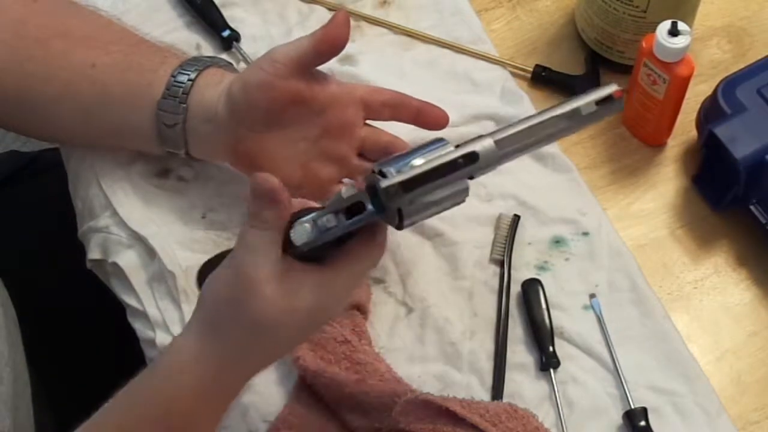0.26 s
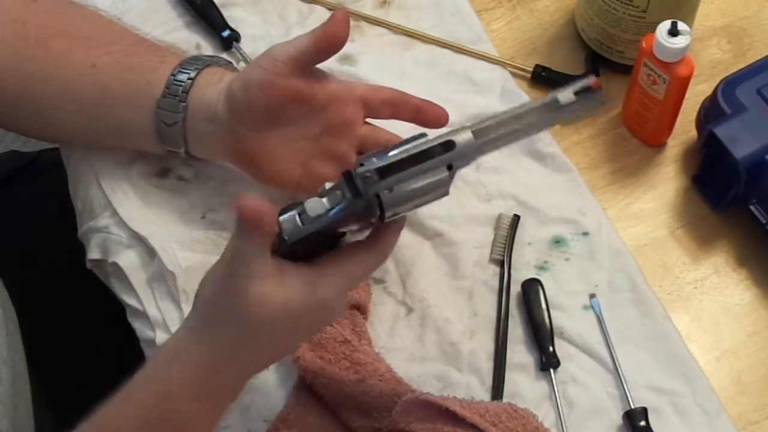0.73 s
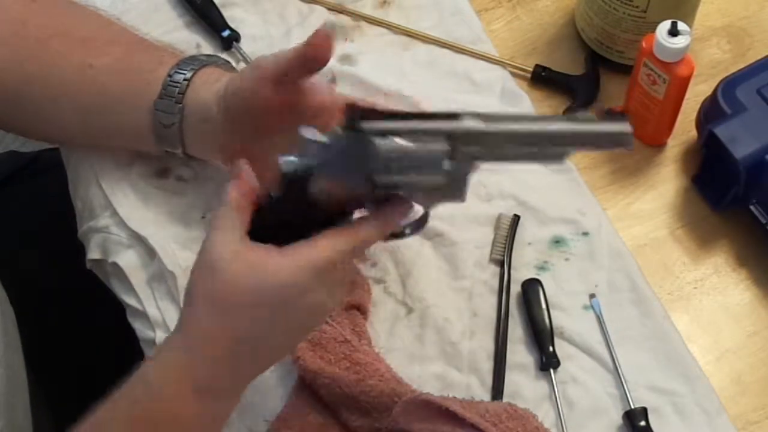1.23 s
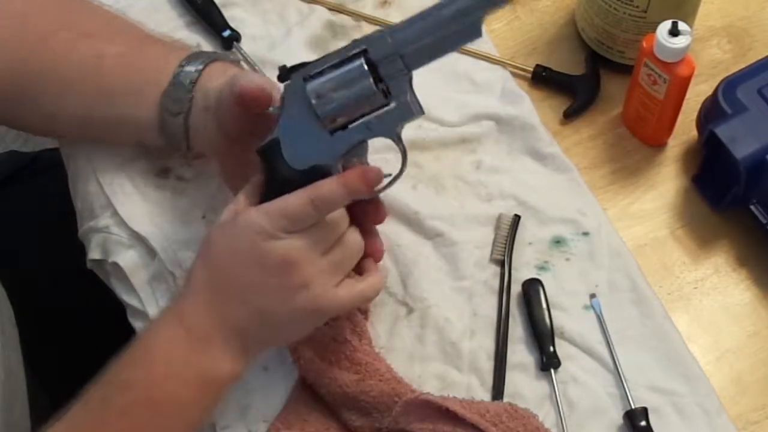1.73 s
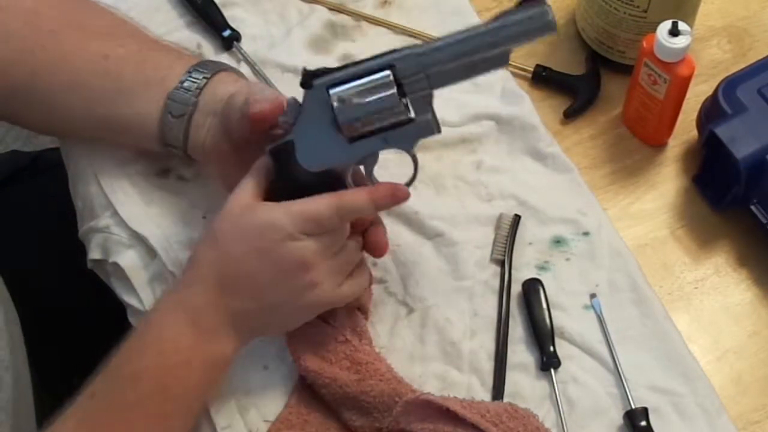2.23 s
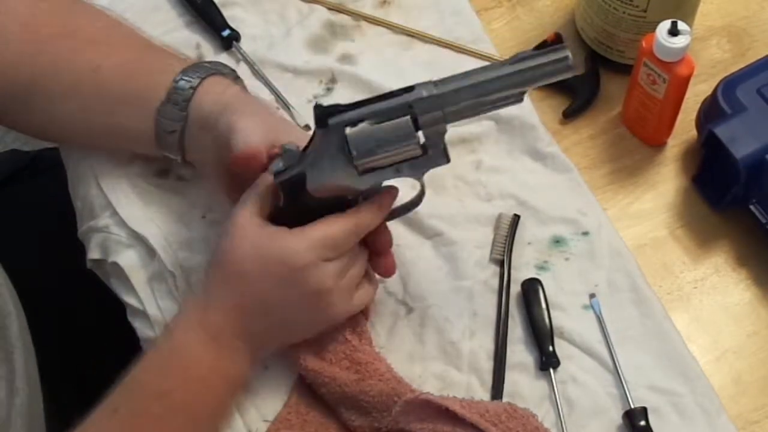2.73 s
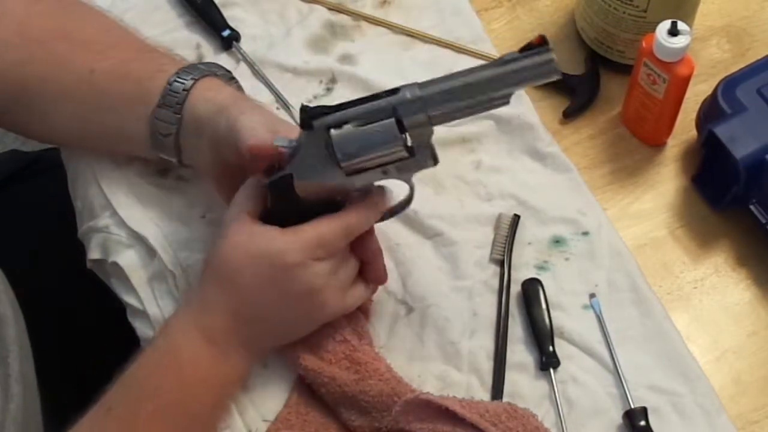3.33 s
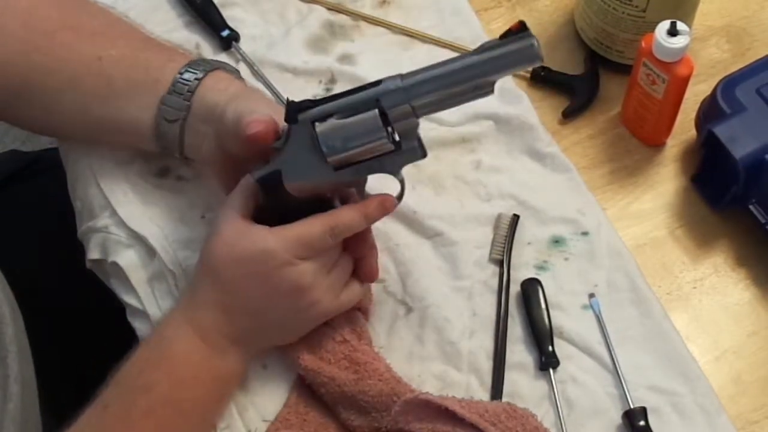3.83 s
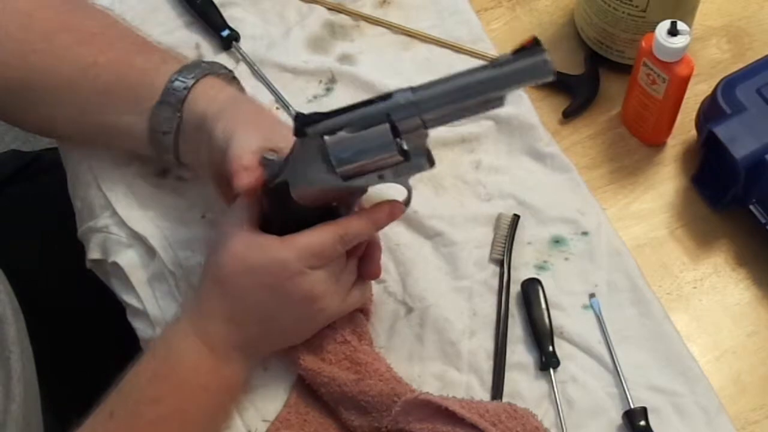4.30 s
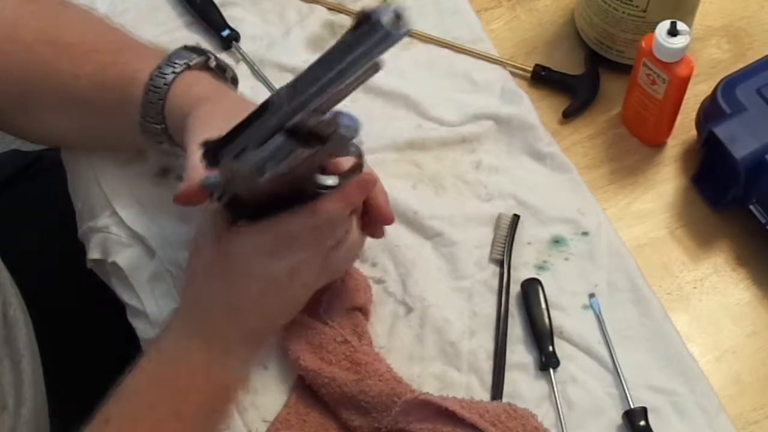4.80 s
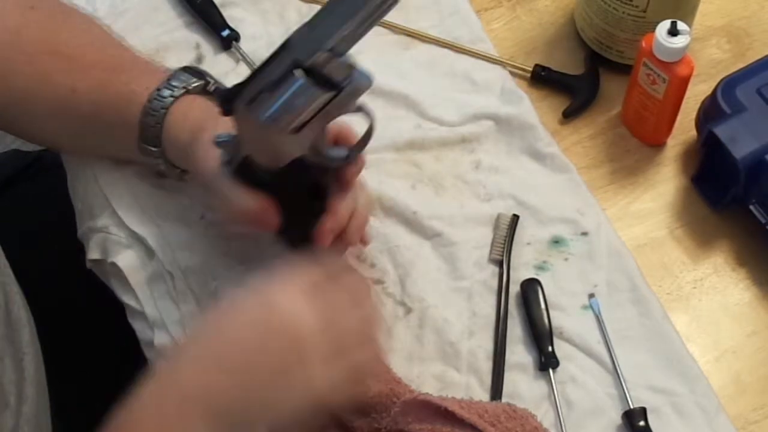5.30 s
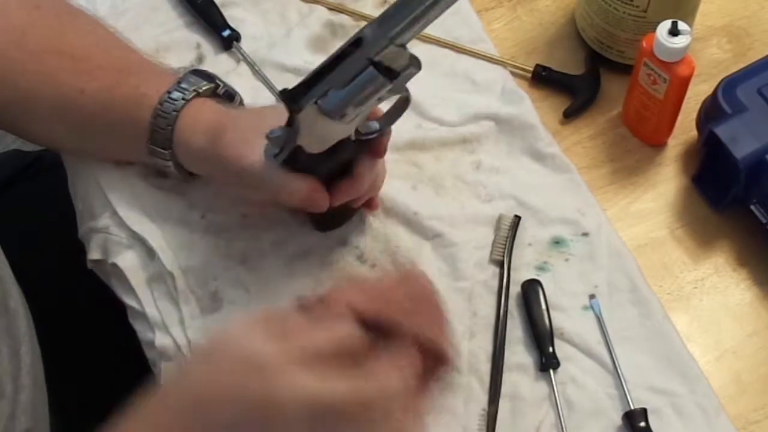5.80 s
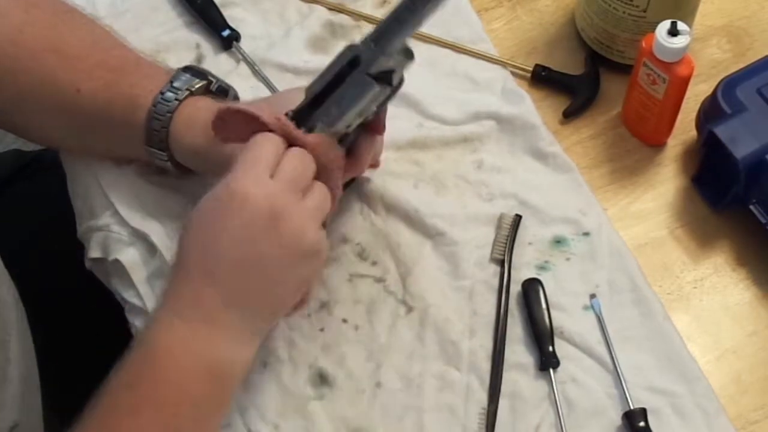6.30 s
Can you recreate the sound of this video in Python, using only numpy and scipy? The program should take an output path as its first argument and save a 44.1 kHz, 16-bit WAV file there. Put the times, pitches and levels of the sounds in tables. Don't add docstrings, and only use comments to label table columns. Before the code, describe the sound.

Two loud, sharp metallic hammer snaps, each followed by trigger clicks and later cocking clicks, then soft cloth brushes in a quiet room with a faint fan.

```python
import sys
import numpy as np
from scipy import signal
from scipy.fft import rfft, irfft, next_fast_len
from scipy.io import wavfile
from scipy.ndimage import uniform_filter1d, map_coordinates

SR = 44100
rng = np.random.default_rng(int(sys.argv[2]) if len(sys.argv) > 2 else 0)


def ratio(d):
    e = np.asarray(d, float) / 20
    return 10 ** e


def output_pcm(signal):
    pcm = np.clip(np.atleast_2d(signal).T, -1, 1) * 32767
    wavfile.write(sys.argv[1], SR, np.round(pcm).astype(np.int16))


N = 288842


def unit(x):
    return x / np.sqrt(np.mean(x ** 2) + 1e-20)


def along(points, hz):
    point_hz, values = np.transpose(points)
    return np.interp(np.log(hz + 1), np.log(point_hz + 1), values)


def filtered(x, response):
    size = next_fast_len(x.shape[-1] + 8192)
    spectrum = rfft(x, size) * response(np.fft.rfftfreq(size, 1 / SR))
    return irfft(spectrum, size)[..., :x.shape[-1]]


def add(track, start_s, sound):
    part = track[round(start_s * SR):][:len(sound)]
    part += sound[:len(part)]


def wobble(rate_hz):
    knots = rng.standard_normal(int(N * rate_hz / SR) + 4)
    return map_coordinates(knots, [np.arange(N) * rate_hz / SR], order=1)


def narrow(hz, wander_hz):
    phase = 2 * np.pi * np.cumsum(hz + wander_hz * wobble(7.3)) / SR
    return np.sqrt(2) * ratio(1.5 * wobble(11)) * np.sin(phase)


def puffs(table, width):
    out = np.zeros(N)
    t = np.arange(SR // 4) / SR - 1 / 8
    for s, length_s, hz, db in table:
        band = lambda f: np.exp(-((f - hz) / (width * hz)) ** 2)
        rasp = filtered(rng.standard_normal(len(t)), band)
        swell = ratio(db) * unit(rasp) * np.exp(-(t / length_s * 2) ** 2)
        start_s = s + t[0]
        add(out, max(start_s, 0), swell[max(-round(start_s * SR), 0):])
    return out


# (frequency [Hz], density [dB per Hz])
AIR_SPECTRUM = [(15, -39), (38, -21), (100, -19), (250, -13.5), (700, -12), (1850, -17.5), (4300, -25),
                (15000, -27.5)]
# (frequency [Hz], wander [Hz], level [dB])
FAN_TONES = [(59.24, .5, -79.5), (444.3, 2.4, -66), (489, 2.6, -76.5), (606, 2.97, -74), (820, 3.4, -78),
             (1820, 10, -79)]
# (time [s], frequency [Hz], level [dB])
BEARING_CHIRPS = [(2.12, 2660, -75), (3.75, 2700, -77), (4.075, 2700, -74), (4.52, 2600, -70),
                  (4.902, 2600, -69), (5.121, 3120, -68.5), (5.296, 2710, -66), (5.56, 2720, -72),
                  (5.782, 2650, -65), (6.113, 2664, -66)]


def fan():
    air = filtered(rng.standard_normal(N), lambda f: ratio(along(AIR_SPECTRUM, f)))
    rush = ratio(-58 + 0.49 * wobble(1.1)) * unit(air)
    hum = sum(ratio(db) * narrow(hz, wander_hz) for hz, wander_hz, db in FAN_TONES)
    chirp_s = 0.1
    return rush + hum + puffs([(s, chirp_s, hz, db) for s, hz, db in BEARING_CHIRPS], width=0.048)


# (time [s], length [s], centre [Hz], level [dB])
STROKES = [(.05, 0.04, 1370, -54.5), (2.4, 0.23, 700, -64), (4.38, 0.024, 700, -54),
           (4.47, 0.04, 1280, -56.5), (5.8, 0.024, 1020, -57), (5.84, .08, 1110, -62),
           (6.29, 0.036, 600, -59), (6.37, 0.023, 740, -52), (6.41, 0.061, 885, -53.5),
           (6.45, 0.027, 1700, -60), (6.51, 0.027, 754, -56)]


def rustle():
    return puffs(STROKES, width=0.51)


# (delay [s], level [dB])
WALL_ECHOES = [(.0058, -7.5), (0.0095, -21.5), (.0165, -24), (.022, -28.5), (.031, -28)]
# (frequency [Hz], t60 [s])
ROOM_T60 = [(200, .12), (800, 0.35), (2000, 0.3), (5500, 0.34), (9000, 0.34), (14600, .27)]
# (frequency [Hz], level [dB])
ROOM_RETURN = [(400, -4.5), (1300, 1.5), (2300, 0.5), (4800, -1), (8000, -2.5), (14000, -2)]


def in_room(x, walls_db, wet_db, onset_s, blur):
    echoes = np.zeros(2048)
    smear = ratio(-60 * np.arange(128) / SR / 0.0031)
    for delay_s, db in WALL_ECHOES:
        echo = smear * rng.standard_normal(128)
        add(echoes, delay_s, ratio(db + walls_db) * echo / np.linalg.norm(echo))
    echoes[0] += 1

    hz, t = np.fft.rfftfreq(256, 1 / SR), np.arange(140) * 128 / SR
    cells = rng.standard_normal((140, 129)) + 1j * rng.standard_normal((140, 129))
    decay = ratio(-60 * t[:, None] / along(ROOM_T60, hz))
    grains = irfft(cells * decay) * np.hanning(256)
    tail = (grains[1:, :128] + grains[:-1, 128:]).ravel()
    tail *= 1 - np.exp(-(np.arange(len(tail)) / SR / onset_s) ** 2)

    power = uniform_filter1d(np.abs(rfft(x, len(tail))) ** 2, blur)
    power *= ratio(2 * along(ROOM_RETURN, np.fft.rfftfreq(len(tail), 1 / SR)))
    wet = ratio(wet_db) * tail / np.linalg.norm(tail)
    out = irfft(rfft(wet) * np.sqrt(np.abs(power)))
    out[:64] = 0
    add(out, 0, signal.fftconvolve(x, echoes))
    return out


# (time [s], peak [dB], frequency [Hz], t60 [s])
LONE_KNOCKS = [(.0185, -34, 1360, .012), (.0189, -38, 1880, 0.025), (.019, -52, 2500, 0.0074),
               (.02, -47, 440, 0.023), (3.3835, -31, 1040, 0.032), (3.387, -28.5, 1960, .3),
               (3.384, -23.5, 4370, 0.3), (4.276, -23.5, 1975, 0.21), (5.797, -47, 1230, .025),
               (5.799, -52, 678, 0.027), (6.277, -51, 600, .02), (6.365, -35, 3550, 0.15)]
PART_KNOCKS = {"hammer": [(.4, 2.5, 1472, .0055), (.1, 1.5, 361, .006), (.1, 6.5, 733, 0.0032),
               (5.4, -4.5, 745, .005), (1.9, -14.5, 1746, .3), (1.9, -24, 1581, .25),
               (1.9, -21.5, 2403, 0.45), (1.9, -22, 2757, .3), (1.9, -21.5, 3114, .4),
               (1.9, -21, 3700, .42), (1.9, -18, 4420, .4), (1.9, -17, 5460, 0.47), (1.9, -21, 5100, 0.54),
               (1.9, -22, 6810, .4), (1.9, -8.5, 7900, .4), (1.9, -13.5, 9250, .4), (1.9, -15, 12400, .4)],
               "stop": [(.1, -20, 89, 0.084)], "trigger": [(.6, -26, 1310, 0.0054), (1.1, -11, 3480, 0.34),
               (2.1, -7.5, 2456, 0.28)], "bolt": [(4, -27, 94, 0.085)], "hand": [(.2, -20.5, 1025, 0.06)],
               "sear": [(1.2, -15, 740, 0.016), (2.7, -21.5, 260, 0.032), (18, -26, 94, 0.13),
               (2.7, -1, 4490, 0.35), (2.18, -2, 3000, 0.14)]}


def knocks():
    out, t = np.zeros(N), np.arange(SR // 3) / SR
    struck = [(s + ms / 1000, db + under_db, hz, t60_s)
              for part in PART_KNOCKS
              for s, db, _ in PART_CONTACTS[part]
              for ms, under_db, hz, t60_s in PART_KNOCKS[part]]
    for s, db, hz, t60_s in struck + LONE_KNOCKS:
        tones_hz = hz * rng.normal(1, 0.012, size=(8, 1))
        cluster = np.sin(2 * np.pi * tones_hz * t).mean(axis=0)
        push = ratio(db + 1.0 - 60 * t / t60_s) * cluster * (1 - np.exp(-t * hz * 9))
        add(out, s, in_room(push, walls_db=-7.5, wet_db=-19, onset_s=0.0087, blur=21))
    return signal.sosfilt(signal.butter(2, 125, "high", fs=SR, output="sos"), out)


# (frequency [Hz], level [dB], t60 [s])
FRAME_MODES = [(1964, -3.5, .012), (2650, 7.5, .0072), (3860, 5, .0075), (4300, -4, 0.018),
               (6820, -3, 0.0062), (7700, -4.5, 0.0066), (9410, -4, 0.0074), (9980, -5.5, 0.009),
               (12250, 2.5, 0.0036), (13570, 0, .006), (14200, -3, .006), (14700, -8, .006)]
GROUP_CENTRES_HZ = [2200, 4200, 7000, 9500, 12500]
# (frequency [Hz], level [dB])
CRACK_SPECTRUM = [(600, -27.5), (1400, -15), (2200, 6), (4300, 5), (5500, -3), (7000, -1), (15000, -3)]


def strike(crack_db, crack_s):
    t = np.arange(1024) / SR
    member = np.eye(len(GROUP_CENTRES_HZ))
    hz, db, t60_s = np.transpose(FRAME_MODES)[..., None]
    group = np.abs(hz - GROUP_CENTRES_HZ).argmin(axis=1)
    level_db = db + rng.normal(0, 4.2, hz.shape)
    tuned_hz = hz * rng.normal(1, 0.02154, hz.shape)
    rings = ratio(level_db - 60 * t / t60_s) * np.sin(2 * np.pi * tuned_hz * t)

    f = np.fft.rfftfreq(len(t), 1 / SR)
    shares = ratio(along(CRACK_SPECTRUM, f)) * [np.interp(f, GROUP_CENTRES_HZ, row) for row in member]
    fade = ratio(-30 * t / crack_s)
    phases = np.exp(1j * np.angle(rfft(fade * rng.standard_normal(len(t)))))
    crack = ratio(crack_db) * fade * irfft(phases * shares)
    tap = member[group].T @ rings + crack
    return tap * (1 - np.exp(-t / 0.000077))


PART_CONTACTS = {"hammer": [(.5011, -10.5, 1), (3.1782, -10.5, 1.4)], "stop": [(.6997, -37.5, -2),
                 (3.3648, -32.5, .3)], "trigger": [(.7147, -25, 0.5), (3.3829, -24, 0.55)],
                 "bolt": [(2.3258, -32.5, 4.2), (4.2392, -34.5, 5.3)], "hand": [(2.3506, -25, 1.4),
                 (4.2593, -22, -0.12)], "sear": [(2.367, -26, -0.6), (4.2737, -23.5, 0.8)],
                 "play": [(2.2146, -57.5, 0.8), (2.5267, -49.5, 2.5), (4.0375, -62, 0.5),
                 (4.4564, -47.5, 3.3), (5.7966, -53.5, 4.5)], "tick": [(1.7146, -63, 1.7), (4.14, -64, 1),
                 (5.2, -65, 0.5), (6.015, -57.5, 0)], "latch": [(6.2764, -39, -0.9), (6.3646, -39.5, 3.6)]}
PART_COLOUR = {"hammer": (-13, -11.5, -7, 0.34, 1.23), "stop": (-1.2, -5, -3, 4, 3),
               "trigger": (0.7, -0.5, 0.42, -0.37, 3.5), "bolt": (1.5, 6, 1, -7, 1.5),
               "hand": (-1.8, 2.5, -17, -11.5, -1.86), "sear": (-0.58, 0.3, -1, -4, -5),
               "play": (5.5, 0, -9.5, -17, -17.5), "tick": (-19, -7, -9, -1.4, .3),
               "latch": (-6, 1.3, -9.5, -21, -23)}
PART_BOUNCES = {"hammer": [(1.05, -3), (2.2, 0.2), (4.9, 3.14), (6.3, 0.5), (8.5, -5.5), (11, -3)],
                "stop": [(1.8, -1)], "trigger": [(1.05, 7), (1.8, 7.5)], "hand": [(.7, 5)],
                "sear": [(1.9, 4), (3.1, -2.4), (8, -15)], "play": [(1.1, -12)], "tick": [(1.05, -2.1)],
                "latch": [(.9, 2)]}


def action():
    out, first = np.zeros(N), SR // 200
    for part, contacts in PART_CONTACTS.items():
        for s, db, tilt_db in contacts:
            run = np.zeros((2048, len(GROUP_CENTRES_HZ)))
            for ms, under_db in [(0, 0.0026)] + PART_BOUNCES.get(part, []):
                add(run, abs(ms) / 1000, ratio(under_db) * strike(crack_db=28, crack_s=0.0058).T)
            groups_db = db + np.add(PART_COLOUR[part], tilt_db * np.arange(-2, 3))
            group_rms = np.sqrt(np.mean(run[:first] ** 2, axis=0))
            blow = run / group_rms @ ratio(groups_db)
            add(out, s, in_room(blow, walls_db=-0.5, wet_db=-5.0, onset_s=0.011, blur=261))
    return signal.sosfilt(signal.butter(2, 500, "high", fs=SR, output="sos"), out)


def scene():
    return np.tile(fan() + rustle() + knocks() + action(), (2, 1))


def low_pass(x):
    return signal.sosfilt(signal.butter(12, 15830, fs=SR, output="sos"), x)


def record(dry):
    top_hz, edge_hz, offset = 15100, 70, -.0006
    limited = filtered(dry, lambda f: .5 - .5 * np.tanh((f - top_hz) / edge_hz))
    sound = np.clip(limited + offset, -1, 1)
    flips = np.sign(wobble(300))
    loud = uniform_filter1d(np.abs(sound[0]), 1024) > .04
    spells = (wobble(12) > 1.1) | loud
    mismatch = ratio(-27.0) * flips * sound[0] * uniform_filter1d(1. * spells, 256)
    mix = np.clip(sound + [mismatch, -mismatch], -1, 1)
    return low_pass(mix)


dry = scene()
out = record(dry)
output_pcm(out)
```